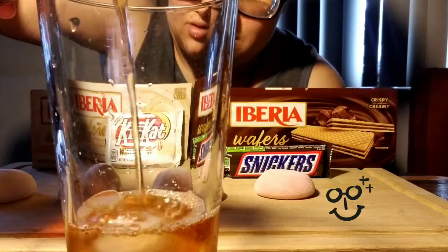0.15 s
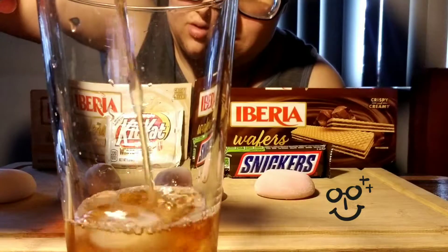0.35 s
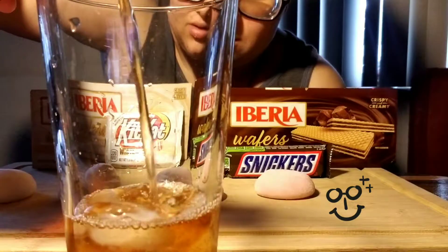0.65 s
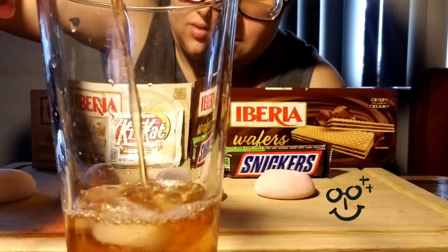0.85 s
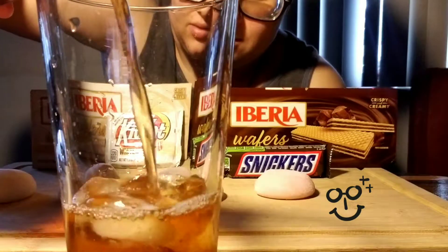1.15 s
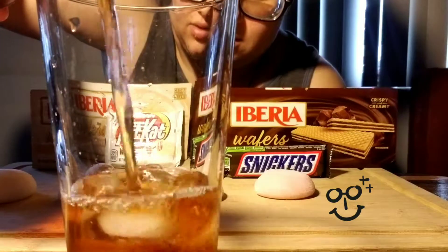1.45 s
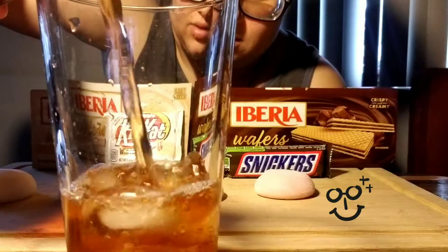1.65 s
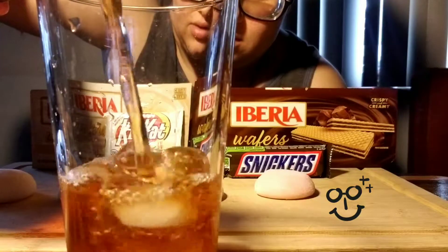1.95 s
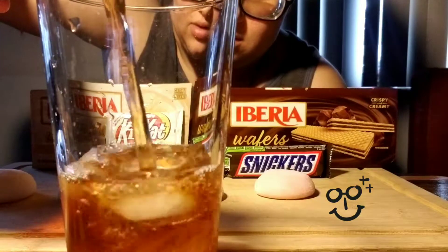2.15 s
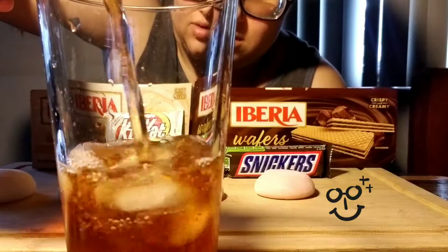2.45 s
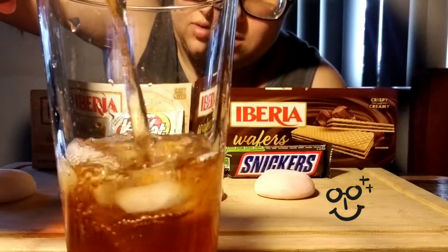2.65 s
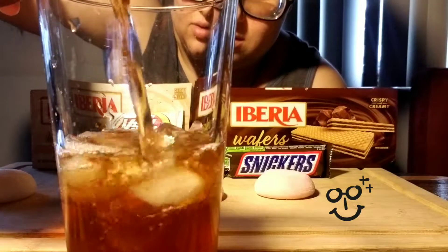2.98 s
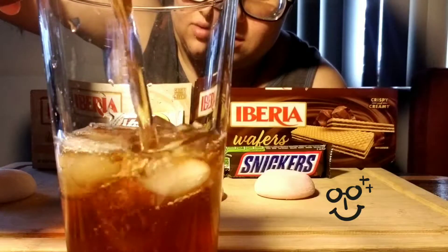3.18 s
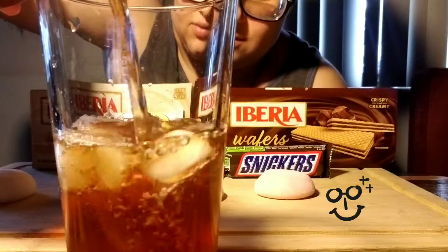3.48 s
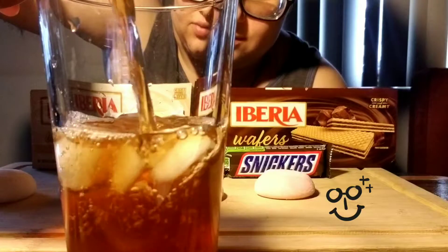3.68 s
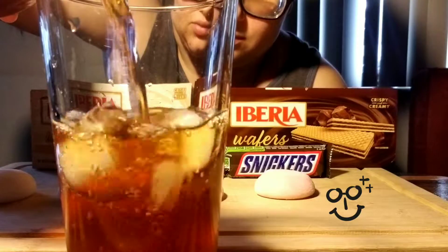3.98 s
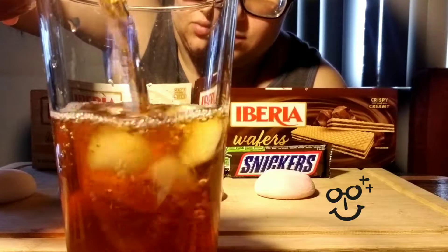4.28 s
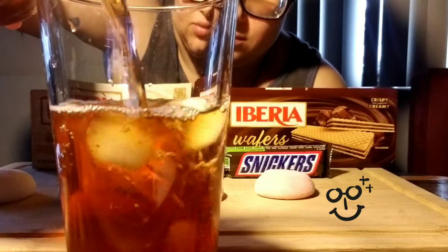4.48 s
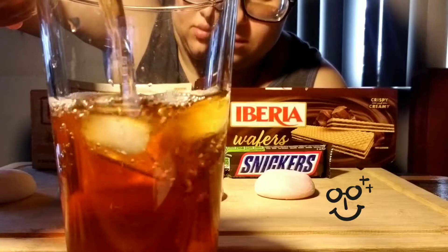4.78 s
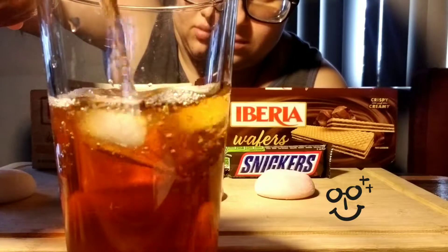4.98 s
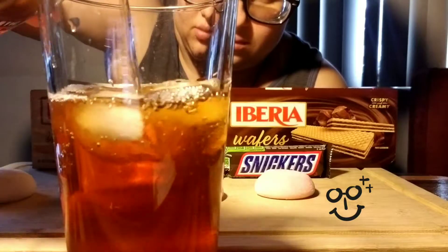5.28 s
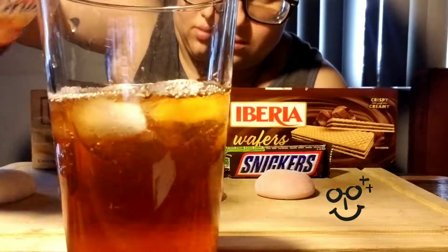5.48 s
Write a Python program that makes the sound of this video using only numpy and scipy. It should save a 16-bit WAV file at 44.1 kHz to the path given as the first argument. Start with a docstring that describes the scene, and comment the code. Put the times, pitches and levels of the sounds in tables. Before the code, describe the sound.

A drink trickles and gurgles into a tall glass while ice cubes knock and clink, over a low indoor hum.

```python
"""A drink is poured over ice in a tall glass, close to a stereo microphone in a small room.
From the start an appliance hums over the rumble of the house, and a thin stream traps bubbles that
ring as they pulsate. Drops burst, and the first ice knocks excite the modes of the glass wall.
Near two seconds the stream swells to a gurgle and the knocks crowd; the wall's notes sink as liquid
loads it. Near five seconds the pour thins, and a few last knocks ring the full glass."""
import sys
import numpy as np
from scipy import signal
from scipy.fft import rfft, irfft, next_fast_len
from scipy.io import wavfile
from scipy.ndimage import uniform_filter1d, map_coordinates

SR = 44100
rng = np.random.default_rng(int(sys.argv[2]) if len(sys.argv) > 2 else 0)


def transcribe(u):
    """Save the signal u as a 16-bit wav file named by the first command-line argument.

    u: samples, shape (n,) or (channels, n), limited to [-1, 1]; the rate is SR.
    q: integer samples, one column per channel.
    """
    v = np.clip(np.atleast_2d(u).T, -1, 1)
    q = np.round(v * 32767).astype(np.int16)
    wavfile.write(sys.argv[1], SR, q)


N = 248062

# Levels in the tables are relative: each source adds its own gain.
# Swell of the appliance hum: time_s, level_db
HUM_LEVEL = [(0.0, -52), (0.58, -44), (0.66, -77.5), (0.78, -40.5), (0.83, -50.5), (1.25, -48), (1.3, -64),
             (1.44, -42), (1.61, -48), (1.69, -77), (1.8, -44.5), (2.5, -53.5), (2.54, -45), (3.33, -55.5),
             (3.79, -43), (5.01, -56.5), (5.6, -48), (5.62, -44)]
# Noise spectra of the house, the stream and the splashes: frequency_hz, density_db
RUMBLE_SPECTRUM = [(12, -100), (24, -23), (40, -6), (52, -15.5), (79, -1.5), (102, -3), (277, -18),
                   (406, -19.5), (532, -27), (900, -35.5), (1170, -102), (1980, -120)]
HISS_SPECTRUM = [(530, -48), (900, -44), (1150, -35), (1240, 3.5), (3400, -9), (4850, 4.5), (5320, 5),
                 (5920, -2), (7400, 5), (9040, -76), (11900, 7.5), (15000, -5)]
GLUG_SPECTRUM = [(500, -24), (750, -18), (1050, 6), (1350, 2), (1700, -11), (2500, -78)]
SLOSH_SPECTRUM = [(1100, -45), (1600, 27), (2000, 12), (2500, 31.5), (3000, 22), (4000, -67)]
SPRAY_SPECTRUM = [(2500, -19), (3600, -1), (4800, 2), (6300, -2), (7600, 2.5), (8800, -15.5), (10500, -91)]
FIZZ_SPECTRUM = [(8000, -28), (10500, 4.5), (12800, -3.5), (14300, -5), (15000, -22), (16000, -60)]
SPATTER_SPECTRUM = [(800, -7), (2000, -5.5), (5000, -5), (7500, -13.5), (10000, -22.5)]
MIST_SPECTRUM = [(5000, -18), (8000, -4.5), (11000, -10), (14000, -21), (15500, -36)]
# Likeness of left and right noise: frequency_hz, correlation
STEREO_CORRELATION = [(30, 0.93), (50, 1), (100, 0.95), (250, 0.96), (700, 0.4), (2000, 0.081),
                      (5000, 0.11), (12000, -0.034)]
# Course of the pour: time_s, glug_db, trickle_db, rattle_db, spray_db
POUR_LEVELS = [(0.0, -61, -63.5, -82, -64.5), (0.2, -76, -66.5, -87, -74), (0.41, -89, -70, -88, -79),
               (0.55, -81, -63, -82, -69), (0.75, -83, -60, -65, -63), (0.97, -106, -61.5, -67, -63),
               (1.11, -87, -67, -89, -68), (1.16, -87, -62.5, -75, -63.5), (1.33, -69, -75, -65, -66),
               (1.38, -66, -51.5, -72, -61), (1.5, -58, -54, -77, -64), (1.54, -82, -73.5, -67, -68.5),
               (1.75, -65, -56, -63, -61.5), (1.86, -61, -56, -63, -59), (1.99, -52, -56, -63, -59),
               (2.14, -56, -67.5, -64, -64.5), (2.35, -55, -66, -69.5, -64.5), (2.6, -77, -65.5, -70, -73),
               (2.8, -73, -72, -85, -68), (3.05, -81.5, -92, -64.5, -68.5), (3.27, -59, -69, -57.5, -54.5),
               (3.47, -65, -65, -60.5, -65), (3.76, -58, -64.5, -65.5, -63), (3.97, -67, -64, -70, -64),
               (4.12, -56.5, -56, -73, -64.5), (4.71, -69, -70.5, -69.5, -72.5),
               (4.91, -81, -108, -86, -76.5), (5.18, -78, -64, -100, -73.5), (5.31, -70, -67, -77, -67),
               (5.45, -78, -71, -84, -74.5), (5.62, -90, -109, -101, -75)]
# Three wall modes as the glass fills: time_s, low_hz, middle_hz, high_hz
WALL_MODES = [(0, 1920, 3060, 4330), (2.3, 1880, 2990, 4310), (4.4, 1725, 2960, 4310),
              (5.62, 1705, 2950, 4330)]
# Decay of each mode before ice damps it: empty_t60_s, full_t60_s
WALL_DECAY = [(0.093, 0.046), (0.072, 0.019), (0.22, 0.053)]
# Share of each mode in the rattle: empty_db, full_db
RATTLE_WEIGHTS = [(8, -7), (19.5, 20.5), (-25, 21)]
# Close twin that beats with each mode: above_hz, relative_db, t60_s
TWIN_MODES = [(15.9, -38, 0.1), (40, -5.5, 0.034), (25, -33, 0.1)]
# Distinct bubbles of the thin early stream: start_s, level_db, pitch_hz
SINGLE_BUBBLES = [(0.0529, -42, 1850), (0.1215, -40.5, 1870), (0.1532, -42, 1940), (0.364, -51, 1980),
                  (0.378, -44, 2150), (0.5407, -48, 2200), (0.5621, -44, 2070), (0.597, -41.5, 2220),
                  (0.6293, -51, 1760), (0.645, -50, 1850), (0.7045, -49, 1730), (0.7348, -50.5, 1810),
                  (0.7675, -46, 2300), (0.8315, -41.5, 2150), (0.8694, -46.5, 2150), (0.885, -51, 2140),
                  (0.9102, -52, 2530), (0.9358, -44, 2070), (0.955, -53, 1780), (0.979, -50.5, 1980),
                  (1.037, -49.5, 2000), (1.069, -52, 2060), (1.085, -52, 2070), (1.098, -52, 2120),
                  (1.1102, -48.5, 2040), (1.3706, -41, 2360), (1.3922, -44.5, 2220), (1.4406, -45.5, 2400),
                  (1.4915, -53, 1590), (1.6292, -48.5, 2630), (1.646, -47.5, 2440), (1.6791, -52, 2500),
                  (1.7225, -50, 2590)]
# Treble pings with hiss, from bursting drops and from the bright top of some ice knocks: start_s, level_db,
# pitch_hz, relative_hiss_db
TREBLE_PINGS = [(0.122, -37.5, 7830, -25), (0.144, -51.5, 5500, -6), (0.352, -47, 5560, -10),
                (0.391, -51, 5000, 7), (0.495, -41, 6170, -19), (0.5651, -59, 6260, 8),
                (0.7213, -56, 5100, -5), (0.7486, -46, 5450, -14), (0.7777, -51.5, 5500, 2.5),
                (1.191, -48.5, 4700, -38), (1.372, -41, 4850, -8.5), (1.61, -42.5, 6000, -17),
                (1.856, -37, 4840, -16), (2.681, -40.5, 4720, -41), (3.065, -45, 4760, -18),
                (3.233, -47, 4800, -6), (3.3146, -44, 4800, -28), (3.4024, -38, 4730, -38),
                (3.6403, -45, 4570, -29), (3.9595, -43, 6260, -31), (4.0796, -40, 4400, -35),
                (4.241, -36.5, 4500, -43), (4.338, -46, 4520, -30), (4.388, -48, 4570, -39),
                (5.1945, -48, 4480, -26), (5.269, -38, 4420, -10)]
# Fine droplets hitting the wall: start_s, level_db
DROPLET_TICKS = [(0.375, -46), (0.414, -35), (0.629, -48), (0.6608, -41), (0.699, -38), (0.7571, -43),
                 (0.798, -39), (0.9481, -51), (0.976, -44), (1.0325, -54), (1.0968, -51), (1.49, -52),
                 (1.8092, -49), (1.8286, -43), (2.965, -45), (2.973, -47), (3.062, -54), (3.255, -44),
                 (3.29, -51), (3.312, -48)]
# Ice impacts: start_s, thud_db, thud_hz, low_mode_db, middle_mode_db, high_mode_db
ICE_KNOCKS = [(0.262, -52.5, 774, -54.5, -80, -71), (0.389, -37.5, 1470, -48, -51, -68),
              (1.06, -61, 645, -54, -58, -53.5), (1.392, -42, 1090, -51, -58, -69),
              (1.493, -55, 1130, -59, -67, -75), (1.5015, -49, 1110, -60, -49, -73),
              (1.732, -79, 1100, -72, -47, -71), (1.761, -42.5, 910, -46, -55, -65),
              (1.771, -37, 1160, -36, -41, -64), (1.857, -77, 1130, -57, -36.5, -65),
              (1.91, -37.5, 950, -45, -60, -68), (1.927, -40, 900, -55, -56, -56),
              (1.947, -30, 1093, -49, -49, -57), (1.959, -36, 990, -58, -63, -70),
              (1.987, -47, 1010, -45, -47, -66), (2, -58, 990, -51, -58, -66),
              (2.096, -62, 1000, -53, -51, -72), (2.116, -66, 1030, -67, -34, -78),
              (2.14, -38.5, 985, -48.5, -58, -62), (2.398, -45, 1080, -50.5, -51, -77),
              (2.488, -38.5, 1370, -45.5, -45.5, -66), (2.513, -56, 1300, -56, -47, -55.5),
              (2.554, -40.5, 1170, -54, -51, -60), (2.605, -37, 1060, -53, -55, -69),
              (2.644, -39.5, 1210, -49, -56, -72), (2.682, -31, 1085, -41.5, -37.5, -38.5),
              (2.728, -45, 1300, -52, -54, -75), (2.761, -47, 1210, -52, -61, -64),
              (2.826, -77, 1000, -79, -51, -65), (3.258, -42.5, 1030, -73, -106, -52),
              (3.313, -61, 920, -82, -73, -49), (3.336, -82, 1010, -71, -38, -52),
              (3.352, -82, 829, -62, -32.5, -45.5), (3.445, -43, 824, -56, -45.5, -53),
              (3.49, -40.5, 1330, -53, -52, -66), (3.602, -35.5, 1050, -43.5, -47.5, -46.5),
              (3.705, -39.5, 1230, -69, -50, -53), (3.917, -29, 1110, -42, -40, -60),
              (3.938, -33.5, 1027, -62, -49, -66), (3.99, -36.5, 1030, -36, -45, -55),
              (4.025, -39, 1090, -41, -47, -54), (4.044, -41, 1250, -55, -56, -65),
              (4.079, -38.5, 1050, -41.5, -42, -56), (4.098, -50, 900, -36, -57, -55),
              (4.141, -46, 765, -48, -65, -56), (4.167, -32.5, 736, -44, -62, -52),
              (4.177, -31, 1005, -46, -41, -62), (4.197, -41, 940, -38, -36.5, -34.5),
              (4.201, -37, 766, -45, -65, -70), (4.239, -38, 1300, -41, -33.5, -47),
              (4.28, -43, 640, -62, -64, -72), (4.294, -38.5, 628, -42, -50, -51),
              (4.378, -43, 1200, -50, -67, -70), (4.432, -60, 1210, -47, -72, -57),
              (4.453, -43, 607, -63, -79, -70), (4.455, -34, 1200, -35, -66, -68),
              (4.502, -36.5, 1266, -35.5, -45, -56), (4.577, -26.5, 1210, -26, -55, -61),
              (4.604, -50, 1230, -49, -64, -70), (4.662, -46, 1280, -41.5, -66, -74),
              (4.739, -63, 1210, -53, -62, -67), (4.773, -40, 890, -39.5, -88, -72),
              (4.853, -49.5, 870, -43.5, -73, -74), (4.894, -52, 1650, -40.5, -56, -59),
              (5.137, -34.5, 1112, -37, -56, -56.5), (5.198, -59, 1100, -46.5, -66, -55),
              (5.269, -63, 1470, -50, -76, -42.5), (5.285, -67, 1500, -35.5, -70, -67),
              (5.3, -73, 1530, -32, -48, -48), (5.328, -67, 1490, -38.5, -72, -67),
              (5.369, -51, 1090, -62, -53.5, -76), (5.403, -49, 1120, -49, -56, -87)]
# The stream breaking on a cube: start_s, spatter_db, mist_db, t60_s
STREAM_BREAKS = [(0.353, -53.5, -55, 1), (1.372, -51.5, -53, 0.41), (1.609, -71, -61, 0.25),
                 (1.734, -50, -87, 0.54), (2.963, -83, -60, 0.3), (2.995, -58.5, -73, 1),
                 (3.817, -80, -48.5, 0.24)]
# Reverberation time: frequency_hz, t60_s
ROOM_DECAY = [(500, .2), (2000, .16), (8000, .08)]
# Treble dip and roll-off of the microphone: frequency_hz, gain_db
MIC_RESPONSE = [(6500, 0.5), (9200, -8), (11500, -2), (14500, 2), (14900, -21)]

TIME_S = np.arange(N) / SR
LEAD_S = 6e-5  # sound from the glass reaches the left channel first


def amp(db):
    return 10 ** (np.asarray(db) / 20)


def unit_rms(x):
    return x / np.sqrt(np.mean(x ** 2) + 1e-20)


def over_frequency(points, hz):
    knots_hz, values = np.transpose(points)
    return np.interp(np.log(hz + 1), np.log(knots_hz + 1), values)


def over_time(rows):
    time_s, *columns = np.transpose(rows)
    return [np.interp(TIME_S, time_s, column) for column in columns]


def while_filling(empty_and_full, time_s):
    return np.interp(time_s, [0, N / SR], empty_and_full)


def wobble(rate_hz):
    knots = rng.standard_normal(int(N * rate_hz / SR) + 4)
    return map_coordinates(knots, [TIME_S * rate_hz])


def random_levels_db(count, spiky_db):
    return spiky_db * np.minimum(rng.exponential(1, count), 3)


def filtered(x, response):
    size = next_fast_len(N + 8192)
    return irfft(rfft(x, size) * response(np.fft.rfftfreq(size, 1 / SR)), size)[..., :N]


def rush(spectrum, patchy_db):
    """Partly coherent stereo noise of rms 1, its gain varying in patches of time and frequency."""
    def mid_side_gains(hz):
        angle = np.arccos(over_frequency(STEREO_CORRELATION, hz)) / 2
        return amp(over_frequency(spectrum, hz)) * [np.cos(angle), np.sin(angle)]

    bins = signal.stft(rng.standard_normal((2, N)), nperseg=256)[2]
    patches = uniform_filter1d(rng.standard_normal(bins.shape[1:]), size=5, axis=0)
    patches = unit_rms(uniform_filter1d(patches, size=6, axis=1))
    noise = signal.istft(bins * amp(patchy_db * patches), nperseg=256)[1][:, :N]
    mid, side = filtered(noise, mid_side_gains)
    return unit_rms(np.array([mid + side, mid - side]))


def rings(start_s, hz, db, t60_s, pan_db, samples, lead_s=LEAD_S, rise=0, attack_s=0.00014):
    """Damped oscillators, one per event; pan_db and lead_s favour the left, rise bends the pitch up."""
    start_s, hz, db, t60_s, pan_db, lead_s, attack_s = (
        np.reshape(x, (-1, 1)) for x in (start_s, hz, db, t60_s, pan_db, lead_s, attack_s))
    channels = []
    for side in (1, -1):
        arrival_s = start_s - side * lead_s / 2
        index = np.floor(arrival_s * SR).astype(int) + np.arange(samples)
        t = np.maximum(index / SR - arrival_s, 0)
        envelope = amp(db + side * pan_db / 2 - 60 * t / t60_s) * (1 - np.exp(-t / attack_s))
        wave = envelope * np.sin(2 * np.pi * hz * t * (1 + rise * t / t60_s))
        channels.append(np.bincount(np.clip(index, 0, N).ravel(), wave.ravel(), N + 1)[:N])
    return np.array(channels)


def cracks(start_s, db, hz, spread, t60_s, pan_db, partials):
    """A brief impulse has a broad spectrum: heavily damped partials scattered around hz."""
    return sum(rings(start_s + 0.000339 * np.abs(lag), hz * np.exp(spread * detune), db + 3 * gain,
                     t60_s, pan_db, samples=480, lead_s=LEAD_S * (1 + lag), attack_s=0.0003)
               for detune, gain, lag in rng.standard_normal((partials, 3, len(start_s))))


def house():
    """An appliance hum, modulated in frequency and amplitude, over broadband rumble and hiss."""
    hum_db, = over_time(HUM_LEVEL)
    hum_hz = 99.1 + 4.44 * wobble(14)
    hum = amp(hum_db + 1.5 * wobble(8)) * np.sqrt(2) * np.sin(2 * np.pi * np.cumsum(hum_hz) / SR)
    rumble = amp(-48.5) * amp([[0.35], [-0.35]]) * rush(RUMBLE_SPECTRUM, patchy_db=0.26)
    hiss = amp(-68.5) * rush(HISS_SPECTRUM, patchy_db=0.5)
    return hum * amp([[0.4], [-0.4]]) + rumble + hiss


def wall_hz(mode, time_s):
    """Mass loading: the wall's natural frequencies sink as the glass fills."""
    knots_s, *modes_hz = np.transpose(WALL_MODES)
    return np.interp(time_s, knots_s, modes_hz[mode])


def bubbles(count, hz, spread, cycles, spiky_db, samples, lead_spread_s=8e-5):
    """Minnaert resonance: each bubble in a crowd is a spring of air moving a mass of liquid."""
    start_s = rng.uniform(0, N / SR, count)
    detune, pan, lead = rng.standard_normal((3, count))
    centre_hz = np.broadcast_to(hz, N)[(start_s * SR).astype(int)]
    pitch_hz = np.minimum(centre_hz * np.exp(spread * detune), SR / 3)
    crowd = rings(start_s, pitch_hz, random_levels_db(count, spiky_db), cycles / pitch_hz, 2 + 2 * pan,
                  samples, lead_s=LEAD_S + lead_spread_s * lead, rise=0.05, attack_s=0.7 / pitch_hz)
    return unit_rms(crowd)


def stream():
    """Bubble pitch varies inversely with radius: large ones glug, smaller ones trickle, spray and fizz."""
    glug_db, trickle_db, _, spray_db = over_time(POUR_LEVELS)
    trickle_hz = while_filling((1.143, 0.87), TIME_S) * wall_hz(0, TIME_S) * np.exp(0.055 * wobble(9.8))
    # The fizz swings with the spray, and foam gradually muffles it.
    fizz_db = while_filling((-62, -80), TIME_S) + 0.64 * (spray_db - spray_db.mean())
    glug = 0.8 * bubbles(650, 1030, spread=0.12, cycles=26, spiky_db=5, samples=1000,
                         lead_spread_s=1.5e-4)
    trickle = 0.9 * bubbles(2600, trickle_hz, spread=0.087, cycles=37, spiky_db=4.5, samples=800,
                            lead_spread_s=6e-5)
    spray = 0.5 * bubbles(1500, 4750, spread=0.069, cycles=34, spiky_db=9, samples=400)
    ticks = 0.63 * bubbles(2500, 5500, spread=0.33, cycles=10, spiky_db=6.5, samples=120)
    fizz = 0.47 * bubbles(2500, 12500, spread=0.12, cycles=6.6, spiky_db=4, samples=120)
    glug += 0.4 * amp([[1.5], [-1.5]]) * rush(GLUG_SPECTRUM, patchy_db=3.5)
    trickle += 0.42 * rush(SLOSH_SPECTRUM, patchy_db=0)
    spray += ticks + 0.85 * rush(SPRAY_SPECTRUM, patchy_db=6)
    fizz += 0.68 * rush(FIZZ_SPECTRUM, patchy_db=6)
    return (amp(glug_db) * glug + amp(trickle_db) * trickle + amp(spray_db) * spray
            + amp(fizz_db) * amp([[-1.5], [1.5]]) * fizz)


def ice_rattle(count=900):
    """Random impulsive excitation: light taps of jostled ice keep the wall's modes ringing."""
    start_s = rng.uniform(0, N / SR, count)
    tap_db = random_levels_db(count, spiky_db=3)
    taps = 0
    for mode, weight_db in enumerate(RATTLE_WEIGHTS):
        gain, detune, place = rng.standard_normal((3, count))
        db = tap_db + while_filling(weight_db, start_s) + 3 * gain
        hz = wall_hz(mode, start_s) * (1 + 0.018 * detune)
        t60_s = 0.63 * while_filling(WALL_DECAY[mode], start_s)
        taps += rings(start_s, hz, db, t60_s, 1.1 * place, samples=1300, lead_s=5e-5 * (1 + place))
    rattle_db = over_time(POUR_LEVELS)[2]
    return amp(rattle_db) * unit_rms(taps)


def plips():
    """Pinch-off: a bubble's neck closes with a tick, and the trapped air rings with rising pitch."""
    start_s, db, hz = np.transpose(SINGLE_BUBBLES)
    notes = rings(start_s, hz, db + 10, 28 / hz, pan_db=2.5, samples=1800, rise=0.021, attack_s=0.00079)
    for lag, detune, place in rng.random((4, 3, len(start_s))):  # weaker neighbours follow
        notes += rings(start_s + 0.027 * lag, hz * (0.932 + 0.13 * detune), db + 2 - 8 * lag, 34 / hz,
                       4 * place, samples=900, lead_s=0.00016 * place, rise=0.056, attack_s=0.00059)
    return notes + cracks(start_s, db - 8, hz, spread=0.27, t60_s=0.0052, pan_db=-5, partials=3)


def drops():
    """Small, brief sources radiate treble: bursting drops and some ice knocks ping and hiss, finer ones tick on
    the wall."""
    start_s, db, hz, hiss_db = np.transpose(TREBLE_PINGS)
    tick_s, tick_db = np.transpose(DROPLET_TICKS)
    pings = rings(start_s, hz, db + 7.5, 55 / hz, pan_db=0, samples=900)
    ticks = cracks(tick_s, tick_db - 3.5, 13250, spread=0.06, t60_s=0.005, pan_db=-7, partials=4)
    hiss = cracks(start_s, db + hiss_db + 10.5, 10350, spread=0.246, t60_s=0.005, pan_db=-6.5, partials=5)
    return pings + ticks + hiss


def wall_ring(start_s, modes_db, attack_s=0.0012):
    """Free vibration: wet ice strikes the wall softly, and three modes beat with their close twins."""
    sound = 0
    for mode, (db, pan_db) in enumerate(zip(modes_db, (3, -1.5, 1.5))):
        hz = wall_hz(mode, start_s)
        # Ice resting on the wall shifts and damps each ring.
        detune, damping, twin_gain = rng.standard_normal((3, len(start_s)))
        t60_s = while_filling(WALL_DECAY[mode], start_s) * np.exp(-0.3 * np.abs(damping))
        sound += rings(start_s, hz * (1 + 0.0077 * detune), db + 1, t60_s, pan_db,
                       samples=3000, attack_s=attack_s)
        above_hz, twin_db, twin_t60_s = TWIN_MODES[mode]
        sound += rings(start_s, hz + above_hz, db + twin_db + 3 * twin_gain, twin_t60_s, -pan_db,
                       samples=4000, lead_s=2 * LEAD_S, attack_s=attack_s)
    fourth_mode = rings(start_s, hz=7550, db=modes_db[2] - 13, t60_s=0.04, pan_db=0, samples=2000)
    return sound + fourth_mode


def ice_knocks(pan_db=3):
    """Impact excites both bodies: ice thuds in the liquid, the wall rings and the contact cracks."""
    start_s, db, hz, low_db, middle_db, high_db = np.transpose(ICE_KNOCKS)
    thuds = rings(start_s, hz, db, 20 / hz, pan_db, samples=3000, attack_s=0.00066)
    for lag, detune, place in rng.random((14, 3, len(start_s))):  # neighbouring cubes answer
        answer_db = db - 6 - 16 * lag - 6 * place
        thuds += rings(start_s + 0.082 * lag, hz * (0.948 + 0.088 * detune), answer_db, 34 / hz,
                       pan_db - 3 * place, samples=1300, lead_s=LEAD_S + 2e-4 * (place - 0.4),
                       attack_s=0.00088)
    wall = wall_ring(start_s, (low_db, middle_db, high_db))
    contact_db = (db + middle_db) / 2 + 4
    contact = cracks(start_s, contact_db, 1575, spread=0.22, t60_s=0.007, pan_db=pan_db, partials=4)
    crack = cracks(start_s, high_db - 8, 4850, spread=0.272, t60_s=0.019, pan_db=pan_db - 4, partials=8)
    return thuds + wall + contact + crack


def splashes():
    """Jet breakup: the stream shatters on a cube into spatter and mist, whose noise decays exponentially."""
    spatter, mist = sum(
        (TIME_S > start_s) * amp(np.array([[spatter_db], [mist_db]]) - 60 * abs(TIME_S - start_s) / t60_s)
        for start_s, spatter_db, mist_db, t60_s in STREAM_BREAKS)
    return spatter * rush(SPATTER_SPECTRUM, patchy_db=4) + mist * rush(MIST_SPECTRUM, patchy_db=3)


def room(x):
    """Reverberation: diffuse reflections arrive after a short delay and die fastest in the treble."""
    hz, t, bins = signal.stft(rng.standard_normal((2, SR // 3)), SR, nperseg=256)
    decay = amp(-60 * t / over_frequency(ROOM_DECAY, hz)[:, None])
    tail = signal.istft(bins * decay, SR, nperseg=256)[1]
    delayed = np.pad(x, ((0, 0), (150, 0)))
    return signal.fftconvolve(delayed, tail / np.linalg.norm(tail[0]), axes=1)[:, :N]


def scene():
    """Superposition: the direct sound of the glass, its reverberation and the house add together."""
    glass = stream() + splashes() + plips() + drops() + ice_rattle() + ice_knocks()
    return glass + amp(-11) * room(glass) + house()


def record(dry):
    """Frequency response: the microphone colours the treble and passes nothing above its band limit."""
    return filtered(dry, lambda hz: amp(over_frequency(MIC_RESPONSE, hz)) * (hz < 15730))


dry = scene()
out = record(dry)
transcribe(out)
```